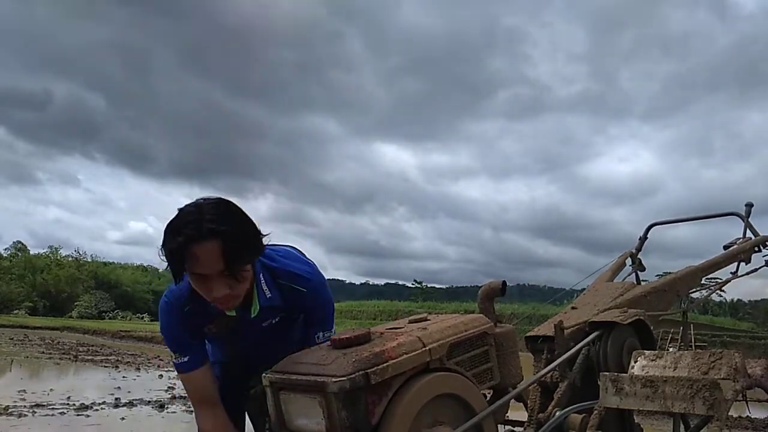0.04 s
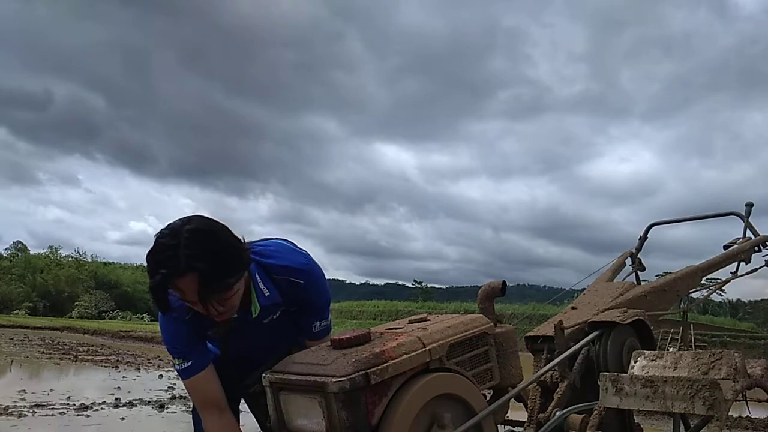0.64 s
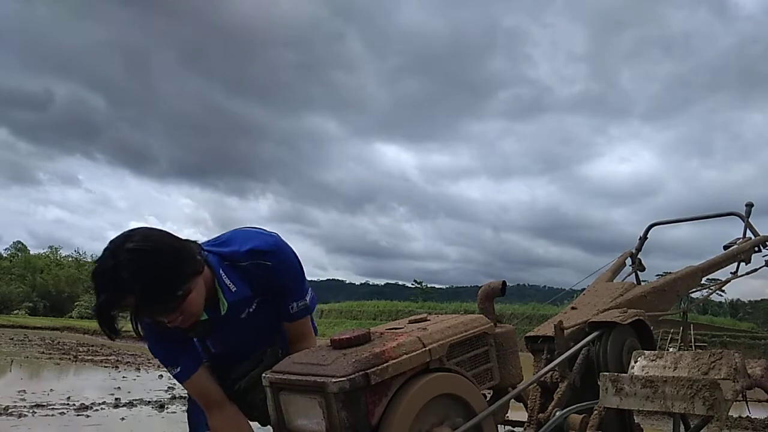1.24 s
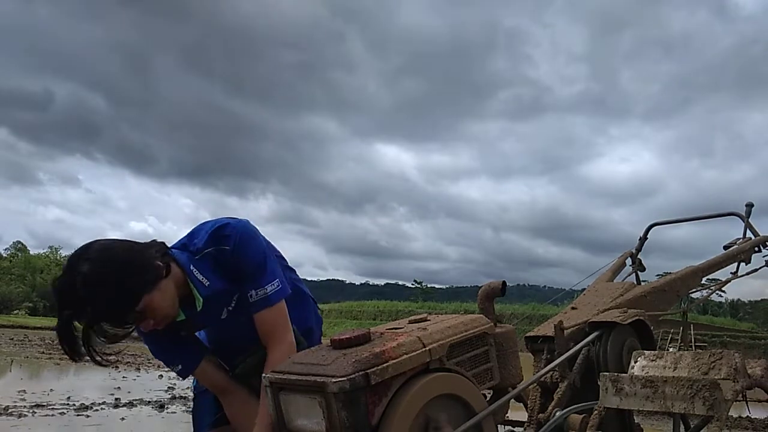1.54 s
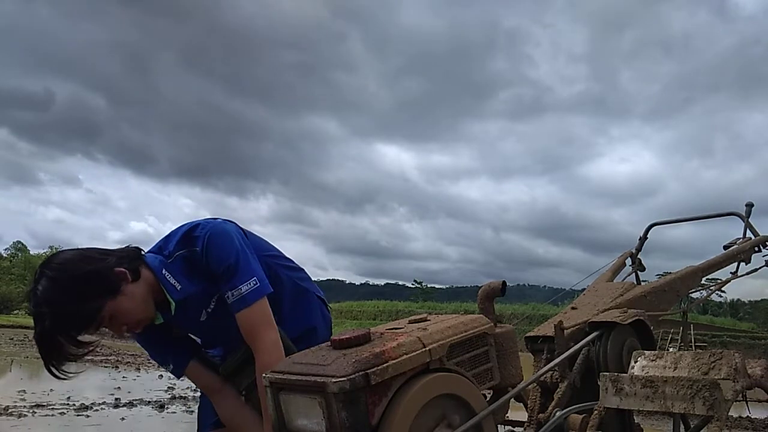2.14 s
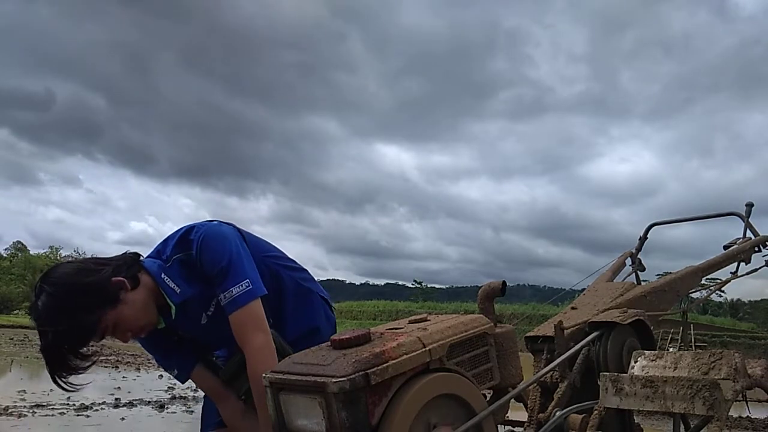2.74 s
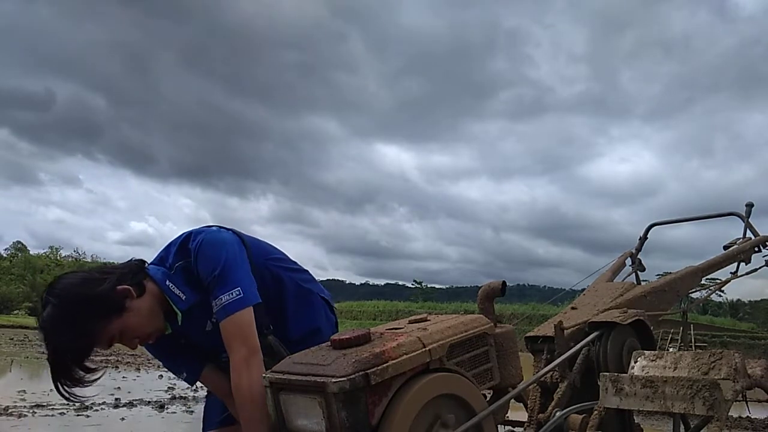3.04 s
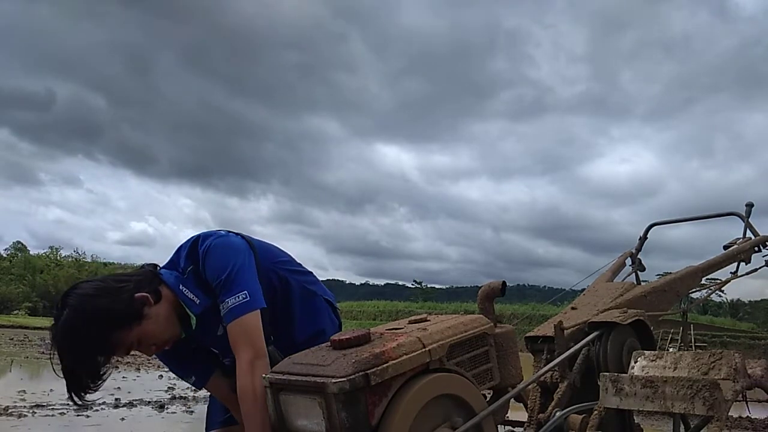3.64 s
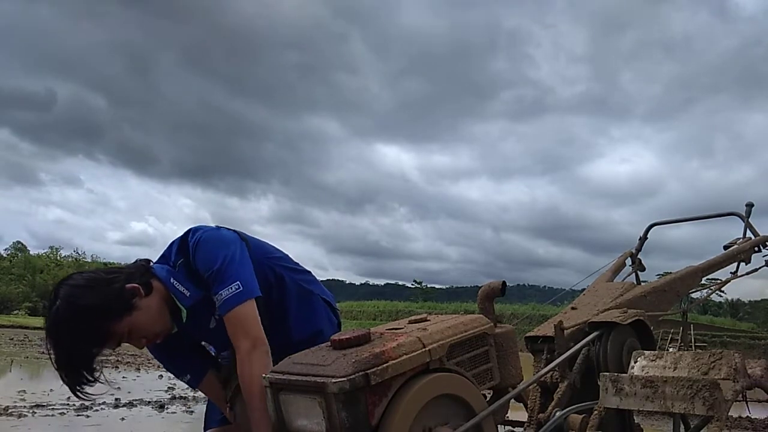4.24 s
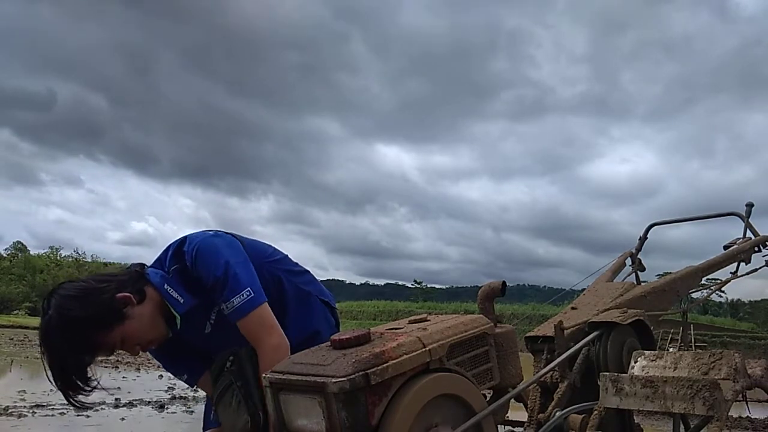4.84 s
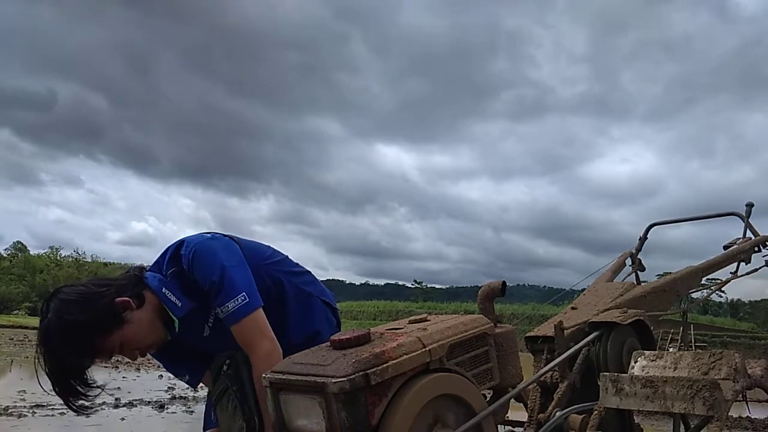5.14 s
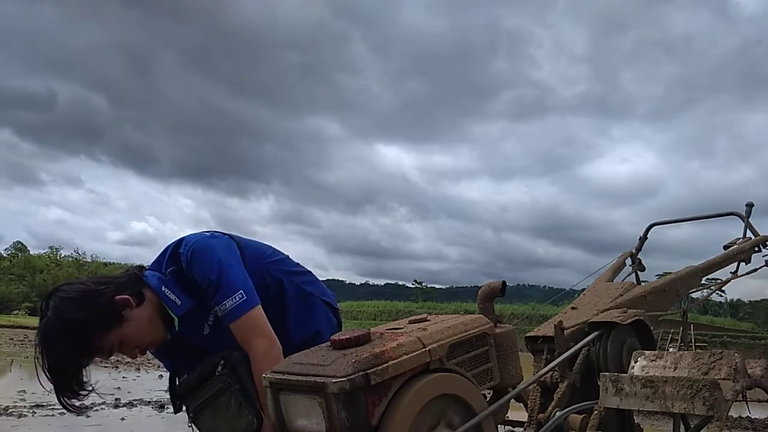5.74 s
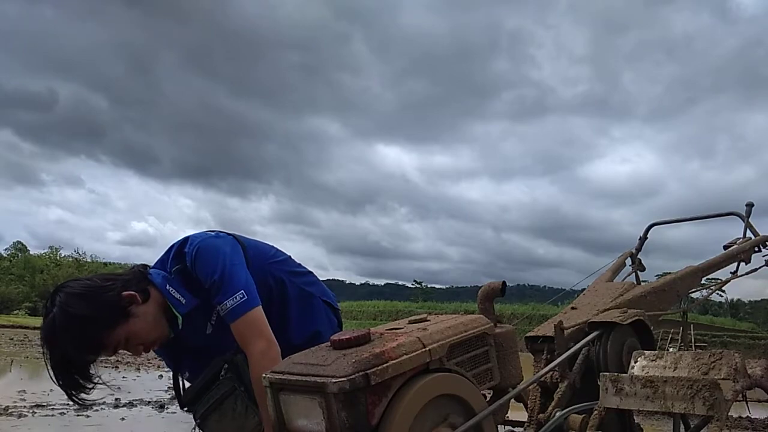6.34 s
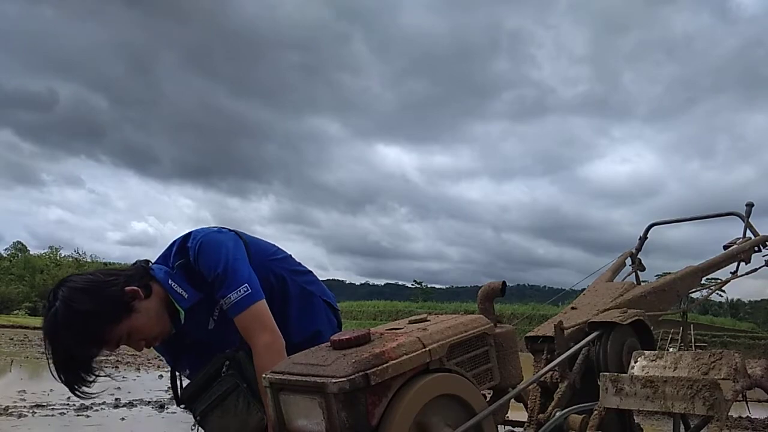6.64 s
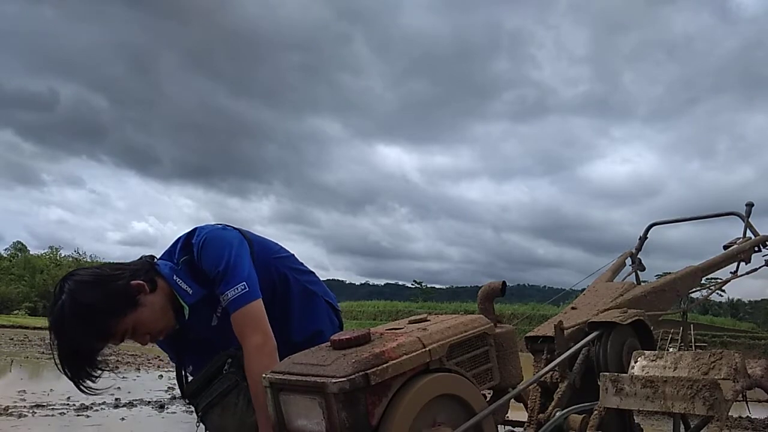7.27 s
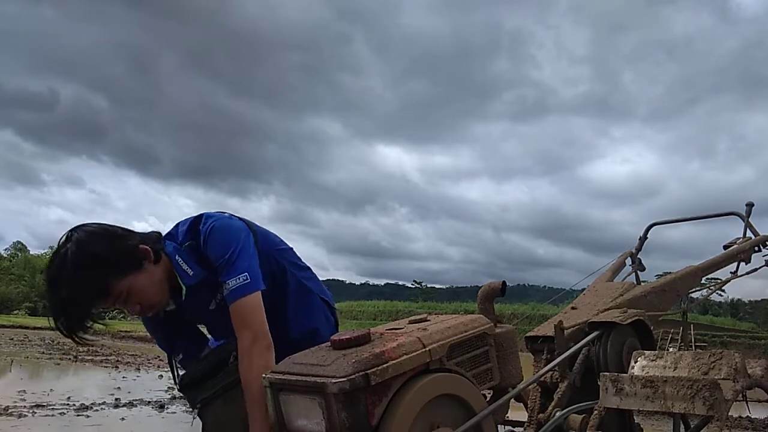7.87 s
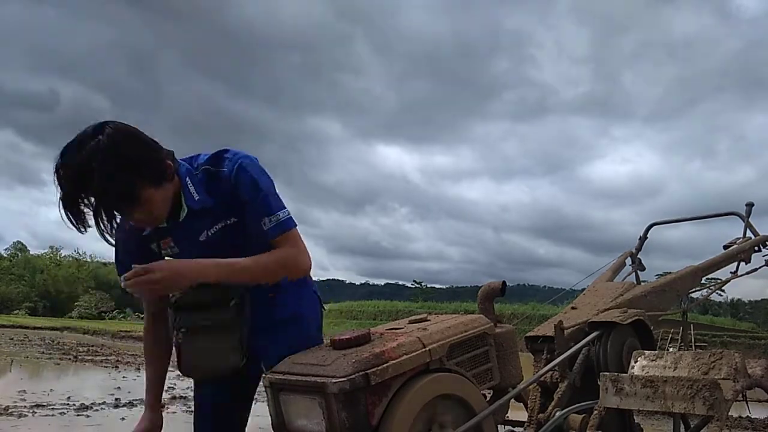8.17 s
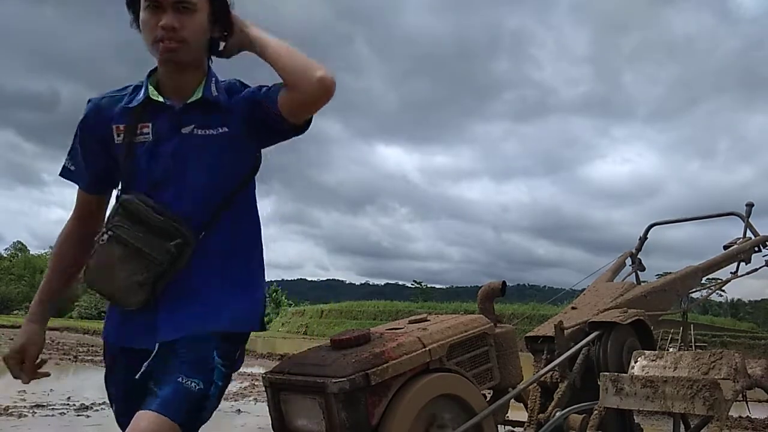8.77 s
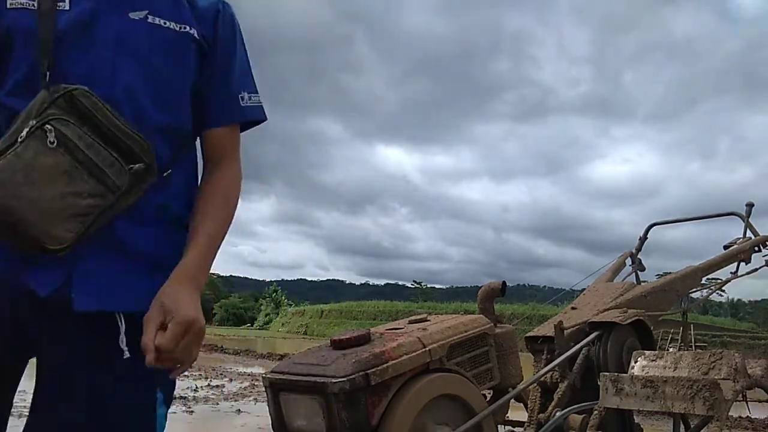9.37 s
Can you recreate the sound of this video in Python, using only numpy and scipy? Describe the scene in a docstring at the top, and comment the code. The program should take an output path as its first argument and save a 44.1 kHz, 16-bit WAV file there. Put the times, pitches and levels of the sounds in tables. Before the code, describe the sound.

Steady, clattering putter of a hand tractor's diesel idling outdoors, with rattling sheet metal and low rumbles of wind.

```python
"""A single-cylinder four-stroke diesel on a hand tractor idles close by in an open field.
Every 720 degrees of crank, the combustion knock rings the block, the exhaust hisses and thumps,
the valves change over, and the intake gulps and shuts. Loose sheet metal jingles along,
the flywheel and belt whirr underneath, and gusts of wind buffet the microphone, mostly on the left."""
import sys
import numpy as np
from scipy import signal
from scipy.fft import rfft, irfft
from scipy.io import wavfile
from scipy.ndimage import uniform_filter1d

SR = 44100
rng = np.random.default_rng(int(sys.argv[2]) if len(sys.argv) > 2 else 0)


def dump_mix(stems):
    """Bounce the given channels to the path in sys.argv[1] as a 16-bit WAV at rate SR."""
    frames = np.atleast_2d(stems).T  # one column per channel
    limited = np.clip(frames, -1, 1)  # hard clip at full scale
    pcm = np.round(limited * 32767).astype(np.int16)
    wavfile.write(sys.argv[1], SR, pcm)


N = 419391

# Noise colour of the silencer's and gears' clatter. Each row: frequency in Hz, level in dB.
CLATTER_COLOUR = [(300, -61.5), (500, -44.5), (820, -41.5), (1100, -45), (1700, -45), (2200, -48),
                  (2700, -49.5), (4200, -62), (5400, -49.5), (7000, -95), (12000, -107)]


def knock(db, crack_t60_ms=42, ring_t60_ms=135, ring_share=0.23, head_rise_ms=1.82, case_rise_ms=3.5):
    """Combustion pressure builds in a few ms and hits the block: a hard clank, then a weaker ring."""
    # Modes of crankcase, head and covers. Each entry: frequency in Hz.
    mode_hz = [455, 525, 615, 845, 1056, 1315, 1400, 1480, 1575, 1685, 1745, 1825, 1900, 1980, 2075, 2170,
               2280, 2546, 2656, 3012, 3322, 3600, 3870, 4603]
    # How strongly those modes ring. Each entry: level in dB.
    mode_db = [-36, -37, -36, -48, -45.5, -40, -42.5, -77, -33, -30.5, -33, -34, -32, -32.5, -39, -46.5,
               -54, -42, -48.5, -60.5, -46, -49.5, -48, -48]
    # Piston and gears rebound in their play. Each row: crank angle in degrees, dB relative to the knock.
    rebounds = [(42, -16), (135, -22.5), (425, -44)]
    # Gritty crack of ignition and piston slap. Each row: frequency in Hz, level in dB.
    grit_colour = [(200, -49), (380, -34), (500, -25), (950, -36.5), (1200, -27.5), (1750, -12),
                   (2500, -29), (4200, -33.5), (5500, -38), (7000, -53), (9500, -44), (15000, -72)]
    hz, lead = np.array(mode_hz, float), SR // 100
    ms = (np.arange(SR // 6) - lead) * 1000 / SR
    heavy = hz[:, None] < 1000
    since_peak = ms - np.where(heavy, 4.5, 2)  # the heavy crankcase answers later than the head
    swell = np.exp(np.minimum(since_peak, 0) / np.where(heavy, case_rise_ms, head_rise_ms))
    age = np.log(1000) * np.maximum(since_peak, 0)
    fade = (1 - ring_share) * np.exp(-age / crack_t60_ms) + ring_share * np.exp(-age / ring_t60_ms)
    # bending waves disperse, so the modes do not start in step
    phase = 2 * np.pi * hz[:, None] * ms / 1000 + .28 * np.arange(len(hz))[:, None] ** 2
    modes = undb(mode_db)[:, None] * swell * fade * np.exp(1j * phase)
    clank = ring(crank(0) - lead / SR, db, hz, modes, uneven_db=1.26, loose_rad=0.92)
    for degrees, rebound_db in rebounds:
        blow_db = db + rebound_db + scatter(0.7)
        clank += ring(crank(degrees) - lead / SR, blow_db, hz, modes, uneven_db=4.0, loose_rad=2.29)
    grit = stereo_noise(grit_colour) * (burst(3.9, 1.64, 90, db) + burst(53.5, 0.4, 26, db - 18))
    return clank + grit


def air_pulses(thump_left_db, jitter_s=0.000086):
    """Exhaust and intake push slugs of air; each swings a few times in its pipe."""
    # One cycle's pulses, the exhaust thump first. Each row: crank angle in degrees, pitch in Hz,
    # swell in ms, fade in ms, level in dB, left minus right in dB.
    pulses = [(193, 86, 4.5, 7.17, -16, 8), (173.4, 182, 3.8, 12, -40, 3), (343, 24, 5.5, 6.7, -38.5, 1),
              (370.85, 260, 2.2, 2.55, -31, 2), (395.6, 170, 4.7, 2.03, -31, 2.5),
              (553, 216, 1.9, 20.8, -40, 3.5)]
    out, lead = np.zeros((2, N)), SR // 25
    ms = (np.arange(3 * lead) - lead) * 1000 / SR
    for k, (degrees, hz, swell_ms, fade_ms, db, left_db) in enumerate(pulses):
        scatter_db, dip_share = (.5, 1) if k == 0 else (1.2, .3)
        envelope = np.exp(-.5 * (ms / np.where(ms < 0, swell_ms, fade_ms)) ** 2)
        puff = envelope * np.sin(2 * np.pi * hz * ms / 1000)
        times = crank(degrees) - lead / SR + jitter_s * rng.standard_normal(len(firings()))
        puff_db = db + scatter(scatter_db)
        out[0] += place(times, undb(puff_db + left_db / 2 + dip_share * thump_left_db), puff)
        out[1] += place(times, undb(puff_db - left_db / 2), puff)
    return out


def exhaust(gas_db, jingle_db):
    """Gas blows down as the exhaust valve lifts, and rattles the silencer and the loose sheet metal."""
    # Colours of the gas hiss and the tinny sizzle. Each row: frequency in Hz, level in dB.
    gas_colour = [(200, -90), (450, -33), (820, -29), (1100, -41.5), (1700, -42), (2500, -43.5),
                  (4600, -56.5), (5500, -36), (7000, -49), (9500, -37), (12000, -49.5), (15000, -55)]
    tin_colour = [(1000, -53), (4600, -61), (5500, -45.5), (7000, -52), (9300, -41.5), (12000, -52.5),
                  (15000, -61)]
    hiss = stereo_noise(gas_colour) * burst(145.6, 4.65, 55, gas_db + 0.5)
    silencer = stereo_noise(CLATTER_COLOUR) * burst(193, 26, 153, 0.31 * jingle_db + 2 + scatter(2.3))
    sizzle = stereo_noise(tin_colour) * burst(171, 7, 240, jingle_db + .4)
    return hiss + silencer + sizzle


def valve_train(rattle_db):
    """Tappets tick at valve changeover, gears clatter, the intake valve seats, the injector spits."""
    # Colours of the dull tappet and the bright valve gear. Each row: frequency in Hz, level in dB.
    tappet_colour = [(200, -15.5), (450, -34.5), (620, -34), (820, -36.5), (1100, -45.5), (2500, -55.5),
                     (4200, -55), (5500, -54.5), (7000, -69), (9500, -67.5), (15000, -77)]
    valve_colour = [(500, -103), (820, -102), (1100, -76), (2500, -50.5), (4200, -64), (5500, -48),
                    (7000, -48.5), (9700, -40.5), (12000, -47), (15000, -107)]
    tick = stereo_noise(tappet_colour) * burst(365.6, 4.7, 58, 2.35)
    gears = stereo_noise(CLATTER_COLOUR)
    gears *= burst(396, 4.6, 85, scatter(2.8) + 1) + burst(455, 3.4, 50, scatter(2.6) - 5)
    seat = burst(554.5, 1.2, 59, rattle_db + 1.5) + burst(698, 5, 93, rattle_db - 11 + scatter(4.5))
    injector = burst(2.6, 1.5, 29, rattle_db - 8 + scatter(3.7))
    injector += burst(49, 0.74, 29, rattle_db - 15 + scatter(1.6))
    return tick + gears + stereo_noise(valve_colour) * (seat + injector)


def sheet_metal(jingle_db, chatter_db=-10, chatter_scatter_db=4.0):
    """Loose covers ring at each exhaust kick, and chatter once more at a random point of the cycle."""
    # Modes of the covers. Each row: frequency in Hz, level in dB, time to fade by 60 dB in ms.
    cover_modes = [(1620, -82, 103), (4500, -55, 79), (5520, -56, 130), (5580, -50, 120), (6160, -56, 126),
                   (7600, -52, 120), (8950, -72, 140), (9350, -53, 140), (10200, -47, 110),
                   (10800, -67.5, 120)]
    hz, db, t60_ms = np.transpose(cover_modes)[:, :, None]
    ms = np.arange(SR // 5) * 1000 / SR
    modes = undb(db) * np.exp(-np.log(1000) * ms / t60_ms + 2j * np.pi * hz * ms / 1000)
    kicks = ring(crank(175), jingle_db, hz[:, 0], modes, uneven_db=6.5, loose_rad=2.3)
    chatter_times = crank(rng.uniform(250, 700, len(firings())))
    blow_db = chatter_db + scatter(chatter_scatter_db)
    return kicks + ring(chatter_times, blow_db, hz[:, 0], modes, uneven_db=5.5, loose_rad=1.6)


def flywheel_and_belt():
    """The spinning flywheel and belt make a low whirr that wavers in level."""
    # Colour of the whirr. Each row: frequency in Hz, level in dB.
    whirr_colour = [(30, -23), (100, -28), (220, -30), (400, -40.5), (820, -42), (1100, -52), (1700, -50.5),
                    (4200, -61.5), (5500, -58.5), (7000, -62.5), (9500, -55.5), (15000, -79.5)]
    return stereo_noise(whirr_colour) * undb(2.43 * wander(9) - 5.5)


def low_mids(engine, low_hz=313, high_hz=800):
    """The engine's hollow low mids swell and thin; they drop as someone walks up close."""
    # Level ride of the band. Each row: time in seconds, gain in dB.
    band_ride = [(0, -1.5), (2.2, 2.5), (3.0, 0), (6.4, 0.5), (7.2, 1.5), (8.3, 3.5), (8.7, -2.5),
                 (9.4, -2)]
    band = signal.sosfiltfilt(signal.butter(1, (low_hz, high_hz), "band", fs=SR, output="sos"), engine)
    gain = undb(np.interp(np.arange(N) / SR, *np.transpose(band_ride)))
    return engine + band * (gain - 1)


def wind(attack_s=.05, release_s=.06, lull_db=-57, right_db=-17, flutter_db=6.5):
    """Gusts swell, hold and die away; each side has its own eddies, and the right is sheltered."""
    # Gusts. Each row: start of the hold in seconds, its length in seconds, level in dB.
    gusts = [(0, 0.23, -33), (.77, 0.29, -33.5), (1.34, 0.025, -29.5), (1.585, 1, -33),
             (2.342, 0.26, -29.5), (4.42, 0.39, -35.5), (5.045, 0.79, -35.5), (6.835, 0.085, -41),
             (8.01, 0.23, -27.5), (8.267, 0.64, -32.5)]
    # Rumble of the eddies. Each row: frequency in Hz, relative level in dB.
    buffet_colour = [(10, 1.5), (22, 0.5), (45, 1), (100, 3.5), (150, -17), (220, -14), (400, -69),
                     (1000, -38), (4000, -114)]
    t = np.arange(N) / SR
    strength = undb(lull_db)
    for start, hold, db in gusts:
        shape = np.exp(np.minimum(t - start, 0) / attack_s - np.maximum(t - start - hold, 0) / release_s)
        strength = np.maximum(strength, undb(db) * shape)
    eddies = noise(buffet_colour)
    flutter = undb(flutter_db * np.tanh(wander(28)))  # small eddies ride on the gust, never far above it
    return eddies / eddies.std() * strength * flutter * undb([[0], [right_db]])


def firings(first_s=-.0661):
    """Ignition times in seconds: one every two turns of the crank."""
    # Crank speed, creeping up as the engine warms. Each row: time in seconds, speed in rpm.
    speed = [(0, 753), (1.38, 758.43), (8.32, 768.99), (9.42, 767.47)]
    s, rpm = np.transpose(speed)
    times = [first_s]
    while times[-1] < N / SR:
        times.append(times[-1] + 2 * 60 / np.interp(times[-1], s, rpm))
    return np.array(times[:-1])


def cycle_levels(start_db, easing_db_per_s, hunt_db, scatter_db, swap_s=1.45):
    """Each cycle's level eases as the engine warms; the governor hunts between strong and weak firings."""
    fired = firings()
    strong = (-1) ** np.arange(len(fired)) * np.sign(fired - swap_s)  # their order swaps once
    return start_db - easing_db_per_s * fired + hunt_db * strong + scatter(scatter_db)


def accents():
    """Extra knock and exhaust level for each cycle; zero for ordinary firings."""
    # Harder or softer firings. Each row: time in seconds, extra knock in dB, extra exhaust in dB.
    odd_firings = [(.41, 1, 4.5), (1.05, 1.2, 2), (1.68, -0.5, -4), (2.79, -0.5, 3), (3.26, 0.4, -4.5),
                   (4.68, -0.5, 5.5), (4.83, -3.5, -6), (4.99, 3, 5), (5.62, 4, -1), (5.93, 0, 5),
                   (6.40, -4, 3), (6.72, -0.5, -2), (7.03, 2.2, -0.5), (7.50, .5, 5.5), (7.65, -4.5, -4.5),
                   (8.12, -0.5, 5), (8.75, 0.5, 5), (8.90, -2, -4), (9.06, 4, -3)]
    fired = firings()
    extra = np.zeros((2, len(fired)))
    for s, knock_db, exhaust_db in odd_firings:
        extra[:, np.argmin(np.abs(fired - s))] = knock_db, exhaust_db
    return extra


def crank(degrees):
    """When the crank passes an angle after each ignition."""
    fired = firings()
    return fired + np.gradient(fired) * degrees / 720


def scatter(db):
    """A random level offset for each cycle, never extreme."""
    return db * np.clip(rng.standard_normal(len(firings())), -2, 2)


def burst(degrees, rise_ms, t60_ms, db):
    """An envelope that swells to its peak at a crank angle and dies away, once a cycle."""
    lead = SR // 50
    ms = (np.arange(SR // 4) - lead) * 1000 / SR
    shape = np.exp(np.minimum(ms, 0) / rise_ms - np.log(1000) * np.maximum(ms, 0) / t60_ms)
    return place(crank(degrees) - lead / SR, undb(db + scatter(0.75)), shape)


def place(times, gains, shape):
    """One scaled copy of a shape at each time."""
    out = np.zeros(N + 2 * SR)
    for s, gain in zip(times, gains):
        at = SR + int(s * SR)
        out[at:at + len(shape)] += gain * shape
    return out[SR:SR + N]


def ring(times, db, hz, modes, uneven_db, loose_rad, apart_hz=3000, bass_left_db=7):
    """Strike a set of modes at each time; no two blows land alike, so each mode's size and phase vary."""
    size, shift = rng.standard_normal((len(times), 2, len(hz))).transpose(1, 0, 2)
    blows = undb(db[:, None] + uneven_db * size) * np.exp(1j * loose_rad * shift)
    # the blow's energy is given; chance only shares it out among the modes
    energy = np.sum(np.abs(modes) ** 2, axis=1)
    blows /= np.sqrt(undb(2 * uneven_db * size) @ energy / energy.sum())[:, None]
    # low modes lean left; higher ones reach the two sides less in step
    lean = undb(bass_left_db / (1 + (hz / 1000) ** 4))
    left_over_right = lean * np.exp(1j * hz / apart_hz * (-1) ** np.arange(len(hz)))
    out = np.zeros((2, N + 2 * SR))
    for side, power in enumerate((.5, -.5)):
        waves = ((blows * left_over_right ** power) @ modes).real
        for s, wave in zip(times, waves):
            at = SR + int(s * SR)
            out[side, at:at + len(wave)] += wave
    return out[:, SR:SR + N]


def stereo_noise(colour, wide_hz=3200, bass_left=0.52):
    """Engine noise: lows alike on both sides and stronger on the left, treble unrelated."""
    centre, width = noise(colour)
    lows = signal.lfilter(*signal.butter(1, wide_hz, fs=SR), centre)
    highs = signal.lfilter(*signal.butter(1, wide_hz, 'high', fs=SR), width)
    mid = (centre + (np.sqrt(2) - 1) * lows) / np.sqrt(2)
    side = highs / np.sqrt(2) + bass_left * signal.lfilter(*signal.butter(1, 900, fs=SR), mid)
    return np.array([mid + side, mid - side])


def noise(colour):
    """Two unrelated noises of one colour."""
    hz, db = np.transpose(colour)
    bin_hz = np.arange(SR * 5 + 1) / 10
    gain = undb(np.interp(np.log(bin_hz + 1), np.log(hz), db))
    return irfft(rfft(rng.standard_normal((2, SR * 10))) * gain)[:, :N]


def wander(rate_hz):
    """A smooth random drift: held steps, slewed twice."""
    hold = int(SR / rate_hz)
    steps = np.repeat(rng.standard_normal(N // hold + 1), hold)
    return 1.71 * uniform_filter1d(uniform_filter1d(steps, hold), hold)[:N]


def undb(db):
    """Decibels to gain."""
    return 10 ** (np.asarray(db) / 20)


def scene():
    """The idling engine over the whirr of its flywheel and belt, in the wind."""
    # Level rides of the valve gear's rattle and of the exhaust thump's left side.
    # Each row: time in seconds, gain in dB.
    rattle_ride = [(0, -2.5), (1.0, -1), (3.4, 1), (4.2, -2.5), (7, -3.5), (8.8, -4), (9.4, -1)]
    thump_left_ride = [(0, -9), (.5, -16.5), (.75, -6), (1.15, -12), (1.36, 0), (2.1, -4), (3.1, -2.1),
                       (5.15, -3), (5.95, -9), (6.24, -6.5), (6.5, -2.5), (7.95, 0.5), (8.5, -1.8),
                       (9.4, -1.5)]
    hard_db, kick_db = accents()
    knock_db = hard_db + cycle_levels(start_db=0.14, easing_db_per_s=0.2563, hunt_db=0.2, scatter_db=1.34)
    gas_db = kick_db + cycle_levels(start_db=3.5, easing_db_per_s=1.0, hunt_db=0.77, scatter_db=1.33)
    jingle_db = kick_db + cycle_levels(start_db=-1, easing_db_per_s=0.53, hunt_db=1.2, scatter_db=2)
    rattle_db = np.interp(firings(), *np.transpose(rattle_ride)) + scatter(2.4)
    thump_db = np.interp(firings(), *np.transpose(thump_left_ride))
    whirr = flywheel_and_belt()
    engine = knock(knock_db) + air_pulses(thump_db) + exhaust(gas_db, jingle_db) + valve_train(rattle_db)
    return low_mids(engine + whirr) + sheet_metal(jingle_db) + wind()


def record(dry, top_hz=15200):
    """A steep low-pass takes off the highest treble."""
    return signal.sosfilt(signal.ellip(8, .2, 70, top_hz, fs=SR, output="sos"), dry)


dry = scene()
out = record(dry)
dump_mix(out)
```